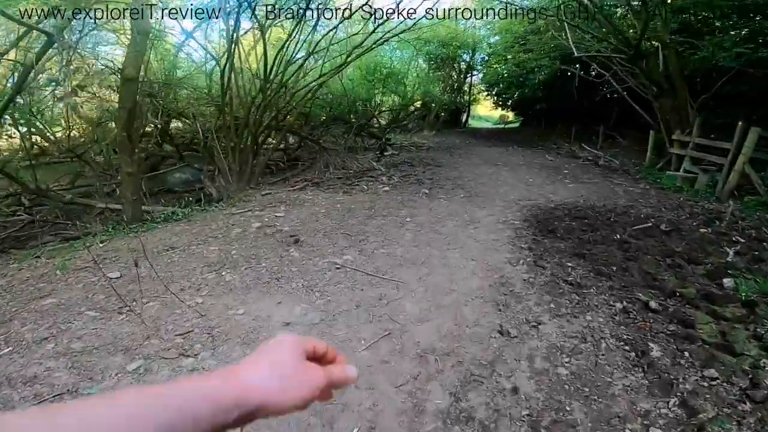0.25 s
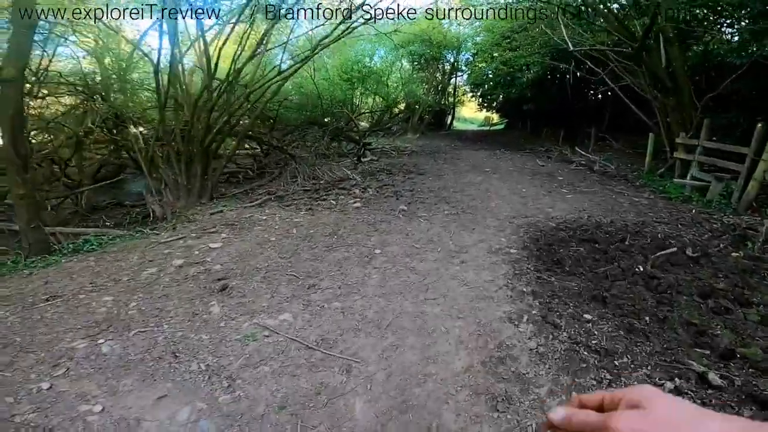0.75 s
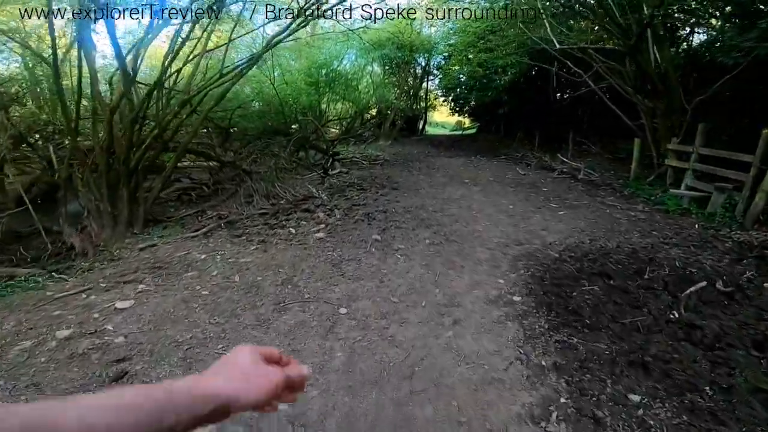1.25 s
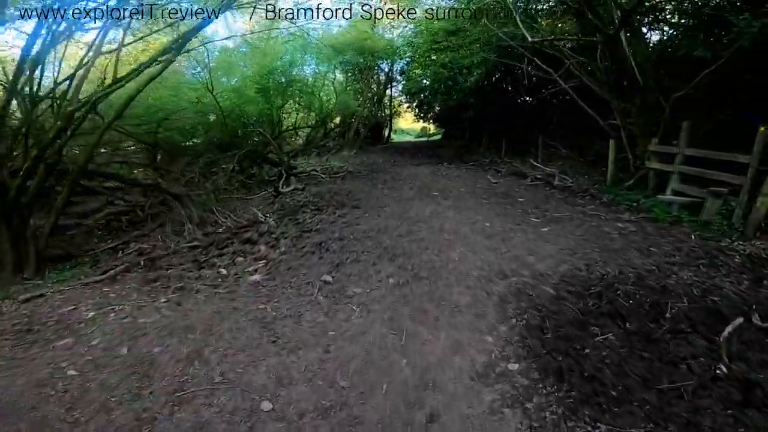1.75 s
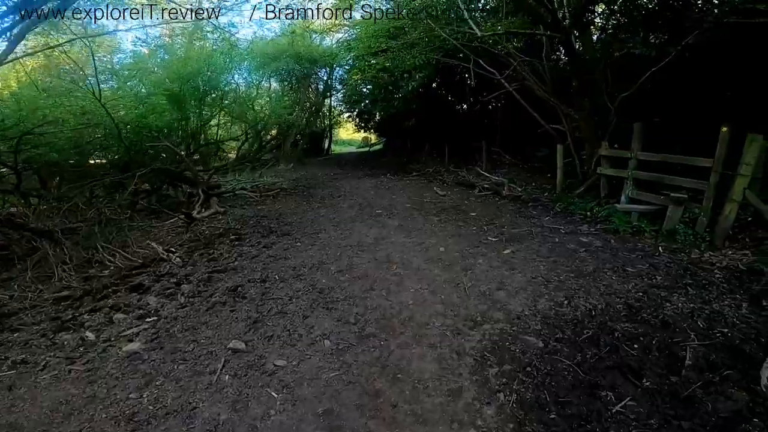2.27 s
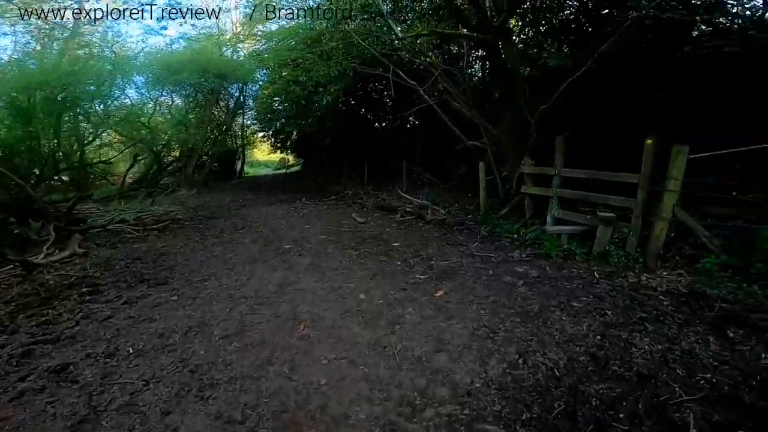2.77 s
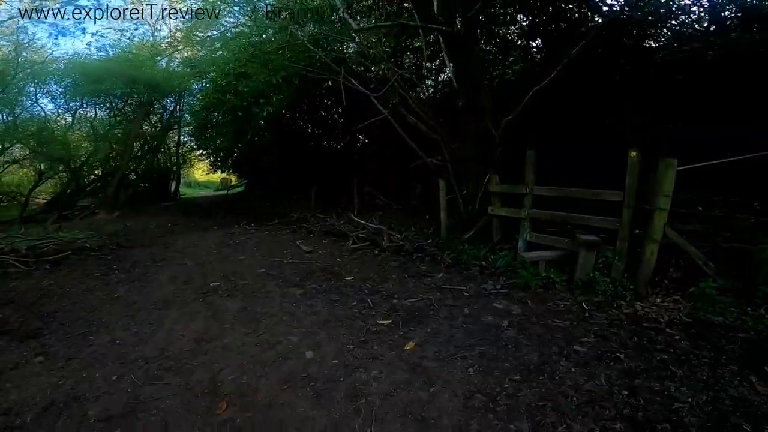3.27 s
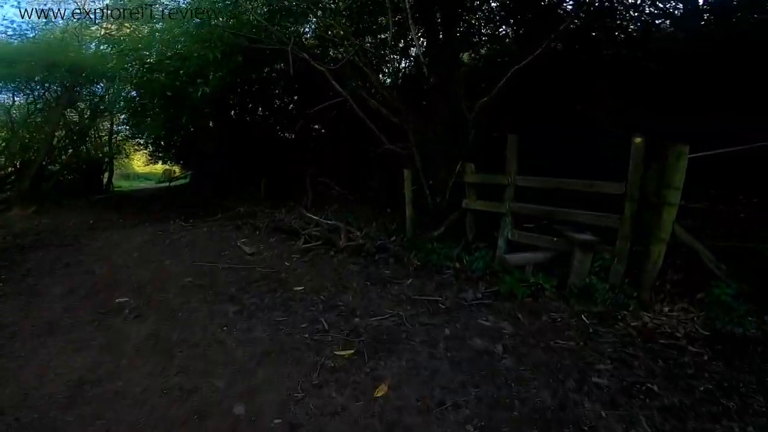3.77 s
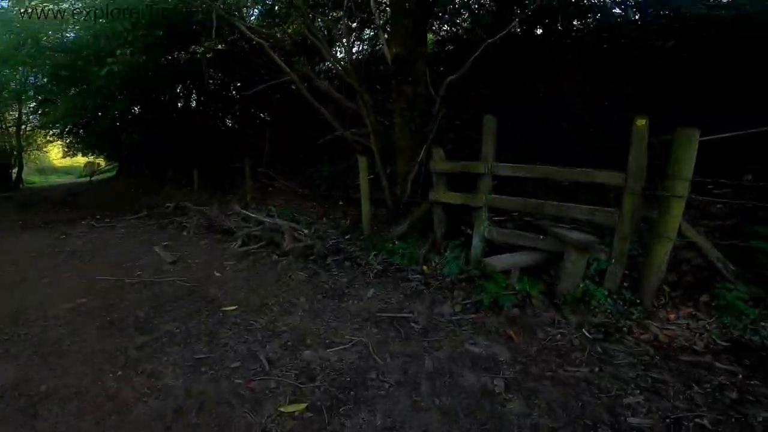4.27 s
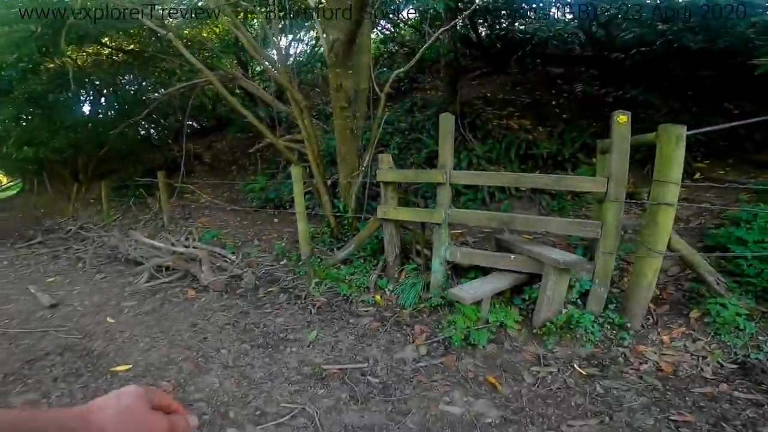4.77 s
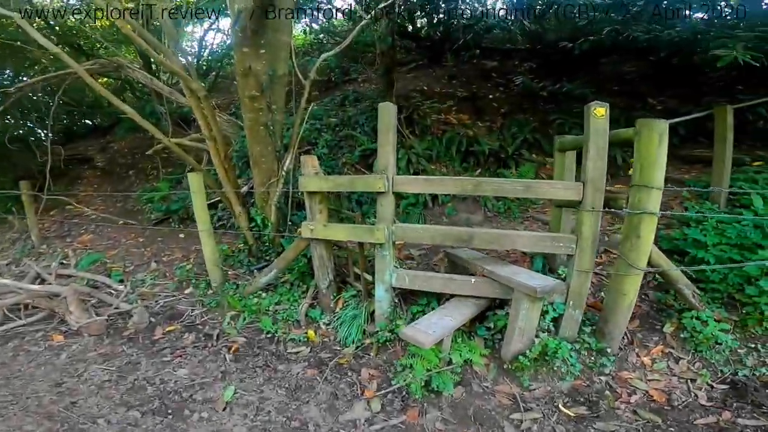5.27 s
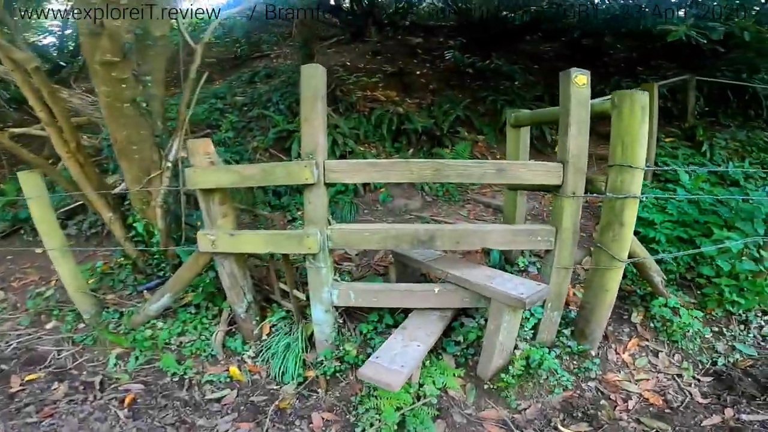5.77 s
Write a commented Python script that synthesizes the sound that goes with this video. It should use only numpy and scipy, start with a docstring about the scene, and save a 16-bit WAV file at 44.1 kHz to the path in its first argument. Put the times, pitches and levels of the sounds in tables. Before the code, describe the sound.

Someone walks a dry dirt path among trees, each step a gritty crunch with dull thuds, stone clicks and soft clothing rustle.

```python
"""A dry woodland path at walking pace, two microphones on the walker's body, beside a worn camera.
Air buffets the microphones from the start (shaped low noise), over the wood's hush and rubbing clothes (noise).
Soles crush grit about twice a second (clumped clicks), stones knock and crack (damped bursts), steps land with
brief low rings and dull thuds (decaying modes). A far bird calls faintly near the start and again near 5.1 s
(gliding sines). Stones rasp and one twig snaps (narrow noise), soles slide through litter (dense clicks) and
dry leaves snap and fizz (bright noise)."""
import sys
import numpy as np
from scipy import signal
from scipy.fft import rfft, irfft, next_fast_len
from scipy.io import wavfile
from scipy.ndimage import uniform_filter1d

SR = 44100
rng = np.random.default_rng(int(sys.argv[2]) if len(sys.argv) > 2 else 0)


def materialize(psi):
    """Save the field psi as 16-bit PCM at rate SR to the path in sys.argv[1].

    A 1-D psi becomes a single channel; in a 2-D psi each row is a channel.
    """
    bounded = np.clip(np.atleast_2d(psi).T, -1, 1)
    quanta = np.round(bounded * 32767).astype(np.int16)
    wavfile.write(sys.argv[1], SR, quanta)


N = 265614
TIME = np.arange(N) / SR
PADDED = next_fast_len(N, True)
FREQS = np.fft.rfftfreq(PADDED, 1 / SR)


def gain_of(db):
    """Amplitude factor of a level in dB."""
    return 10 ** (np.asarray(db) / 20)


def evened(x):
    """Scales to rms 1."""
    return x / np.sqrt(np.mean(x ** 2) + 1e-20)


def read(points, hz):
    """Reads a spectrum table along a log-frequency axis."""
    f, value = np.transpose(points)
    return np.interp(np.log(hz + 1), np.log(f + 1), value)


def curve(rows, axis=1):
    """One column of a time table, at every sample."""
    rows = np.array(rows)
    return np.interp(TIME, rows[:, 0], rows[:, axis])


def swell(centre_s, width_s):
    """A smooth rise and fall of height 1."""
    return np.exp(-((TIME - centre_s) / width_s) ** 2 / 2)


def held(start_s, length_s, rise_s, fall_s):
    """A straight rise to 1, a hold, then an exponential fall."""
    rise = np.clip((TIME - start_s) / rise_s, 0, 1)
    return rise * np.exp(-np.clip(TIME - start_s - length_s, 0, 1) / fall_s)


def panned(db):
    """Left and right gains for a left-right level difference."""
    return gain_of(np.array([db, -db]).reshape(2, -1) / 2)


def add(mix, s, sound):
    """Mixes a sound in at time s."""
    part = mix[:, max(round(s * SR), 0):][:, :sound.shape[-1]]
    part += sound[..., :part.shape[1]]


def colour(x, spectrum):
    """Minimum-phase filter of mean power gain 1: clicks keep their sharp front."""
    hz = abs(np.fft.fftfreq(4096, 1 / SR))
    log_gain = np.log(evened(gain_of(read(spectrum, hz))))
    taps = np.fft.ifft(np.exp(np.conj(signal.hilbert(log_gain)))).real[:2048]
    return signal.oaconvolve(x, taps[None], axes=1)[:, :x.shape[1]]


def paired(x, likeness):
    """Turns two unrelated signals into a partly alike left and right."""
    a, b = rfft(x, PADDED)
    same = np.clip(read(likeness, FREQS), 0, 1)
    shared = np.sqrt((1 + same) / 2) * a
    own = np.sqrt((1 - same) / 2) * b
    return irfft(np.array([shared + own, shared - own]), PADDED)[:, :N]


def noise(spectrum, likeness):
    """Steady stereo noise of rms 1."""
    return evened(colour(paired(rng.standard_normal((2, N)), likeness), spectrum))


def wander(per_s):
    """A random curve of rms 1 that takes a new direction per_s times a second."""
    return evened(np.interp(TIME * per_s, np.arange(N), rng.standard_normal(N)))


def grains(per_s, spread_db, clump_db, clumps_per_s, count=6):
    """Tiny fractures that come in clumps; crumbs of each size sound in their own octave."""
    octave = np.clip(np.log2((FREQS + 1) / 300), 0, count - 1)
    clumps = gain_of(clump_db * np.minimum(wander(clumps_per_s), 2))
    out = 0
    for k in range(count):
        at = np.flatnonzero(rng.random(N) < per_s / SR)
        clicks = np.zeros((2, N))
        spread = np.minimum(rng.exponential(1, N)[at], 3.5)
        size = gain_of(spread_db * spread) * clumps[at]
        clicks[:, at] = size * rng.standard_normal((2, N))[:, at]
        # the foot's weight sets the energy spent in any 40 ms, however it is shared among grains
        clicks /= np.sqrt(abs(uniform_filter1d((clicks ** 2).mean(0), size=1764)) + 1e-9)
        band = np.cos(np.pi / 2 * np.minimum(abs(octave - k), 1))
        out = out + rfft(clicks, PADDED) * band
    return irfft(out, PADDED)[:, :N]


# gusts at the microphones as the walker strides: start t/s, length t/s, level/dB, left-right level/dB
GUSTS = [(-.02, 0.21, -40, 8.5), (0.42, 0.3, -42, 3.5), (0.962, 0.21, -38, 9), (1.467, 0.31, -42, 6.5),
         (2.056, 0.19, -38, 3), (2.569, 0.18, -38.5, 4.5), (3.143, 0.096, -44.5, -1),
         (3.735, 0.26, -46.5, 2), (4.317, 0.099, -49, -3), (4.684, 0.066, -50.5, 1), (4.9, 0.18, -52.5, 0),
         (5.526, 0.064, -43.5, -3), (5.952, .1, -52, 0)]
# steady airflow, easing as the walk slows: t/s, level/dB
DRAUGHT = [(0, -49.5), (.8, -47.5), (1.35, -58.5), (2.4, -51), (3.0, -64), (3.4, -59), (4.2, -63.5),
           (6, -66)]
# single eddies striking the left microphone: t/s, peak level/dB, f/Hz
EDDIES = [(0.098, -24.5, 78), (0.158, -26.5, 85), (0.589, -25.5, 73.4), (1.015, -27.5, 60),
          (1.106, -19.5, 70), (1.146, -20.5, 75), (1.755, -31.5, 74.4), (2.675, -23, 62),
          (2.745, -20, 68.6)]
# spectrum of the turbulence: f/Hz, relative level/dB
WIND_SPECTRUM = [(10, -11.5), (28, 9), (60, -1.5), (110, -10), (170, -15), (260, -26), (500, -45.5),
                 (5000, -110)]
# likeness of the turbulence at the two microphones: f/Hz, likeness (0-1)
WIND_LIKENESS = [(30, 0.56), (200, 0.75)]


def air(right_db=-18, draught_lean_db=3, gust_rise_s=0.023, gust_fall_s=0.042):
    """Low turbulence: gusts rise, hold and die over a draught; an eddy is one swing of pressure."""
    flow = noise(WIND_SPECTRUM, WIND_LIKENESS)
    flow /= np.sqrt(uniform_filter1d(flow ** 2, size=4000, axis=1))
    power = (gain_of(curve(DRAUGHT)) * panned(draught_lean_db)) ** 2
    for s, length, db, lean_db in GUSTS:
        gust = held(s, length, gust_rise_s, gust_fall_s)
        power += (gain_of(db) * panned(lean_db) * gust) ** 2
    out = flow * np.sqrt(power)
    for s, db, hz in EDDIES:
        u = 2 * np.pi * hz * (TIME - s)
        swing = u * np.exp((1 - np.minimum(u ** 2, 100)) / 2)
        out -= gain_of([[db], [db + right_db]]) * swing  # the right microphone gets less
    return out


# spectrum of the wood all round: f/Hz, relative level/dB
WOODS_SPECTRUM = [(30, -4.5), (100, -11.5), (170, 6), (300, -3), (700, -9.5), (1250, -19), (5000, -21),
                  (8000, -27.5), (12000, -42), (14000, -62)]
# spectrum of the hush around 1.3 kHz: f/Hz, relative level/dB
MIDS_SPECTRUM = [(300, -31), (900, -8), (1250, -1), (1650, -10), (3000, -18.5), (8000, -54)]
# how that midrange hush comes and goes: t/s, level/dB
MIDS_LEVEL = [(0, -78), (1.3, -69), (1.9, -65), (2.4, -72), (2.9, -63.5), (3.2, -64.5), (3.6, -70.5),
              (4.6, -73.5), (5, -58.5), (5.4, -75), (6, -63)]
# likeness at the two microphones of the hush and the clothes: f/Hz, likeness (0-1)
WIDE_LIKENESS = [(40, 0.94), (250, 0.75), (1000, 0.48), (2500, 0.22), (6000, 0.12)]


def woods(level_db=-62, lean_db=1.3):
    """The distant hush of the trees: steady broad noise and a midrange that varies in level."""
    steady = gain_of(level_db) * noise(WOODS_SPECTRUM, WIDE_LIKENESS)
    mids = gain_of(curve(MIDS_LEVEL)) * noise(MIDS_SPECTRUM, WIDE_LIKENESS)
    return panned(lean_db) * (steady + mids)


# clothing rubs as a leg swings through between steps: centre t/s, half-width t/s, level/dB
SWINGS = [(.385, 0.035, -61.5), (0.891, 0.041, -62.5), (1.45, 0.025, -59), (1.97, 0.084, -64.5),
          (3.04, 0.042, -68), (4.13, 0.07, -65.5), (4.99, 0.095, -62.5), (5.33, 0.043, -68.5)]
# spectrum of rubbed cloth: f/Hz, relative level/dB
CLOTH_SPECTRUM = [(300, -11), (900, -5.5), (1800, 4), (3000, 1), (6500, -8.5), (9000, -16), (14000, -32)]
# a steady rustle fades as the walk slows
RUSTLE_DB, RUSTLE_DB_PER_S = -67.5, -1
# cloth rubs again as the knee takes the weight after each heel
KNEE_AFTER_S, KNEE_WIDTH_S, KNEE_DB = 0.074, 0.051, -65


def clothes(flutter_db=2.0):
    """Fabric close to the microphones rubs with each leg swing and knee bend: noise follows its speed."""
    speed = gain_of(RUSTLE_DB + RUSTLE_DB_PER_S * TIME)
    speed += sum(gain_of(db) * swell(s, width) for s, width, db in SWINGS)
    speed += gain_of(KNEE_DB) * sum(swell(step[0] + KNEE_AFTER_S, KNEE_WIDTH_S) for step in STEPS)
    return speed * gain_of(flutter_db * wander(90)) * noise(CLOTH_SPECTRUM, WIDE_LIKENESS)


def crunch(start_s, length_s, rise_s=0.0044, shape=2.36):
    """Pressure on the grit: a quick rise, then a fade as it packs down."""
    age = np.maximum(TIME - start_s, 0)
    return (1 - np.exp(-age / rise_s)) * np.exp(-(age / length_s) ** shape)


# footsteps: heel lands t/s, heel crunch level/dB, its length t/s,
# delay until the sole lands t/s, sole crunch level/dB, its length t/s
STEPS = [(-0, -43.5, 0.058, 0.065, -48, 0.02), (0.472, -46.5, 0.029, 0.03, -41, 0.038),
         (1.003, -52, 0.038, 0.08, -53, .025), (1.523, -47.5, 0.03, 0.035, -49.5, 0.071),
         (2.077, -53, 0.024, 0.025, -47.5, 0.027), (2.594, -50.5, 0.014, 0.029, -56, 0.025),
         (3.16, -50, 0.077, 0.09, -51.5, 0.033), (3.708, -52.5, 0.026, 0.085, -51.5, 0.037),
         (4.291, -47.5, 0.024, 0.099, -43, 0.043), (4.78, -44, 0.037, 0.075, -46.5, 0.026),
         (5.51, -58, 0.043, 0.015, -37.5, 0.016), (5.958, -39, 0.018, 0.028, -38, 0.037)]
# grit shifts as the rear foot pushes off: t/s, level/dB
PUSHES = [(.23, -62), (0.778, -59), (1.84, -57), (3.955, -58.5), (5.095, -54.5)]
# grit creaks faintly while the foot bears weight
STANCE_DB, STANCE_S = -61.5, 0.31


def footwork(push_width_s=0.028):
    """How hard the shoes grind: heel, sole, the weight of the stance, push-off."""
    power = sum((gain_of(db) * swell(s, push_width_s)) ** 2 for s, db in PUSHES)
    for heel_s, heel_db, heel_length, delay, sole_db, sole_length in STEPS:
        power += (gain_of(heel_db) * crunch(heel_s, heel_length)) ** 2
        power += (gain_of(sole_db) * crunch(heel_s + delay, sole_length)) ** 2
        power += (gain_of(STANCE_DB) * crunch(heel_s, STANCE_S)) ** 2
    return np.sqrt(power)


# spectrum of crushed grit: f/Hz, relative level/dB
GRIT_SPECTRUM = [(120, -13), (300, 3), (550, 0.5), (800, -6.5), (1100, 2), (1600, -2.5), (2300, -10),
                 (3300, -14.5), (6500, -25), (9000, -34.5), (14000, -61)]
# likeness of sounds from the feet at the two microphones: f/Hz, likeness (0-1)
FEET_LIKENESS = [(200, 1), (1200, 0.99), (2500, 0.64), (5000, 0.96), (10000, 0.77)]


def grit():
    """Grit breaks and shifts under the sole: clumped clicks follow the pressure."""
    breaks = grains(per_s=1400, spread_db=3.0, clump_db=3.0, clumps_per_s=300)
    return colour(footwork() * paired(breaks, FEET_LIKENESS), GRIT_SPECTRUM)


# louder stones and twigs clicking under the shoes: t/s, knock level/dB, knock f/Hz, crack level/dB
STONES = [(0.0163, -32, 1830, -32.5), (0.0525, -36.5, 1140, -65), (0.0718, -41, 866, -50),
          (0.0791, -55, 1700, -46.5), (0.085, -32.5, 1030, -42), (0.222, -50, 780, -74),
          (.473, -47, 955, -70), (.52, -42, 945, -67), (0.568, -46.5, 1350, -55.5),
          (.618, -56, 2020, -52.5), (0.743, -47, 910, -73), (1.0626, -31.5, 1450, -68),
          (1.073, -32, 1640, -39.5), (1.122, -38.5, 1170, -45), (1.127, -33, 1010, -45.5),
          (1.527, -57, 1300, -48), (1.667, -40.5, 1370, -53.5), (1.825, -43, 1280, -59.5),
          (1.838, -44, 1060, -53.5), (2.076, -40, 1700, -59), (2.1628, -35, 1730, -36.5),
          (2.1753, -33.5, 1210, -45), (2.2093, -45, 1100, -50), (2.2128, -26.5, 1170, -44),
          (2.6363, -34.5, 1450, -53.5), (2.6451, -35.5, 800, -67), (2.7, -48, 1540, -54),
          (2.7322, -40.5, 1040, -73), (2.904, -49, 746, -80), (3.1948, -47, 1420, -61),
          (3.2492, -44, 1280, -70), (3.2804, -39.5, 1680, -50.5), (3.7653, -38, 1330, -64),
          (3.7878, -59, 2000, -51), (4.287, -43, 1380, -69), (4.3848, -39, 1310, -70),
          (4.399, -39, 1210, -50), (4.4141, -31.5, 1090, -56), (4.4248, -48, 810, -42),
          (4.438, -22.5, 1090, -39.5), (4.8947, -43, 2320, -46.5), (4.9272, -32.5, 760, -57),
          (4.928, -35, 1430, -44.5), (5.077, -43, 1430, -46.5), (5.1707, -43.5, 1570, -60),
          (5.4855, -45.5, 885, -78), (5.5922, -45, 1020, -67)]
# spectrum of a crack: f/Hz, relative level/dB
CRACK_SPECTRUM = [(400, -66), (1500, 10), (2400, 15), (3450, 13.5), (5000, -1), (6700, -5), (9000, -28),
                  (14000, -40)]


def stones(knock_s=0.0004, crack_s=0.00044, settle_s=0.008, settle_db=-19, grain=0.4, soil_hz=2300):
    """A stone slips with a crack and a brief knock damped by the soil; crumbs settle after it."""
    knocks, cracks = np.zeros((2, 2, N))
    t = np.arange(-130, 1100) / SR
    span = np.sqrt(220)  # sets levels as rms over 5 ms, ahead of the filters below
    blow = 1 / np.cosh(t / knock_s)
    settle = gain_of(settle_db) * np.exp(-abs(t) / settle_s) * (t > 0)
    soil = signal.butter(2, soil_hz, fs=SR)
    for s, knock_db, hz, crack_db in STONES:
        rubble = colour(rng.standard_normal((1, len(t))), GRIT_SPECTRUM)[0]
        crumbs = signal.lfilter(*soil, rubble)
        tone = np.sin(2 * np.pi * (hz * t + rng.random()))
        knock = blow * tone + (grain * blow + settle) * crumbs
        add(knocks, s + t[0], gain_of(knock_db) * span * knock / np.linalg.norm(knock))
        crack = rng.standard_normal((2, len(t))) * (1 / np.cosh(t / crack_s) + settle / 2)
        add(cracks, s + t[0], gain_of(crack_db) * span * crack / np.linalg.norm(crack[0]))
    # a knock has little bass or fizz
    knocks = signal.filtfilt(*signal.butter(2, [380, 5500], "bandpass", fs=SR), knocks)
    return knocks + colour(paired(cracks, FEET_LIKENESS), CRACK_SPECTRUM)


# dull heel thuds and brief low rings as steps land: t/s, level/dB, main f/Hz, left-right level/dB
LANDINGS = [(0.017, -16, 296, -4.5), (0.5696, -20.5, 293, 3), (0.994, -31, 300, 0),
            (1.0744, -17.5, 295, -4.5), (1.266, -44, 353, -1), (1.524, -33, 156, 4),
            (2.083, -33.5, 169, -1), (2.164, -17.5, 298, -5), (2.646, -33, 341, 1), (4.704, -43, 410, 1),
            (5.225, -48.5, 425, 0), (5.529, -36, 330, 0)]
# modes of a landing: multiple of the main f, relative level/dB, 60 dB decay t/s
LANDING_MODES = [(1, 0, 0.044), (.62, 2.5, 0.019), (2.3, -20.5, 0.06)]


def landings(rise_s=0.00038):
    """Dull heel thuds and brief low rings as steps land: each a sum of quickly decaying modes."""
    out = np.zeros((2, N))
    t = np.arange(SR // 10) / SR
    for s, db, hz, pan_db in LANDINGS:
        modes = sum(gain_of(mode_db - 60 * t / t60) * np.sin(2 * np.pi * hz * ratio * t)
                    for ratio, mode_db, t60 in LANDING_MODES)
        add(out, s, gain_of(db) * panned(pan_db) * modes * (1 - np.exp(-t / rise_s)))
    return signal.sosfilt(signal.butter(1, 70, "highpass", fs=SR, output="sos"), out)


def trees(x, t60=0.17):
    """Trunks and leaves scatter a short tail: decaying noise, from 6 ms on, convolved with the sound."""
    t = np.arange(SR // 2) / SR
    tail = rng.standard_normal((2, len(t))) * gain_of(-60 * t / t60) * (t > .006)
    return signal.fftconvolve(x, tail / np.linalg.norm(tail[0]), axes=1)[:, :N]


# far bird notes: t/s, length t/s, start f/Hz, end f/Hz, peak level/dB
BIRD_NOTES = [(0.21, 0.17, 4500, 4400, -72), (5.087, 0.102, 2380, 2715, -58.5)]


def bird(waver=0.004):
    """Thin whistles far off: gliding sines with a slight random waver."""
    out = np.zeros((2, N))
    for s, length, start_hz, end_hz, db in BIRD_NOTES:
        part = np.clip((TIME - s) / length, 0, 1)
        hz = (start_hz + (end_hz - start_hz) * part) * (1 + waver * wander(160))
        out += gain_of(db) * np.sin(np.pi * part) * np.sin(2 * np.pi * np.cumsum(hz) / SR)
    return out


# short rasps of stones, and one bright twig snap at 4.863 s: t/s, half-width t/s, level/dB, f/Hz
RASPS_AND_SNAP = [(0.5133, 0.0016, -38, 1440), (1.579, 0.0032, -34, 1010), (4.8634, 0.00083, -33, 4200),
                  (5.53, .0024, -30.5, 1320), (5.969, 0.0024, -27, 1230)]


def rasps_and_twig_snap(width=0.26):
    """Stones rasp by quick stick and slip, and a twig snaps: short, rough noise around one pitch each."""
    out = np.zeros((2, N))
    for s, length, db, hz in RASPS_AND_SNAP:
        band = np.exp(-(np.log((FREQS + 1) / hz) / width) ** 2 / 2)  # width in natural-log frequency
        burst = swell(s, length)
        rough = burst * irfft(rfft(rng.standard_normal(PADDED)) * band, PADDED)[:N]
        out += gain_of(db) * rough * np.linalg.norm(burst) / np.linalg.norm(rough)
    return out


# the sole slides through loose earth and leaf litter: start t/s, length t/s,
# grinding level/dB, crackle level/dB, pitch of the earth (multiple)
SLIDES = [(1.011, 0.025, -59, -56, 1), (1.819, 0.012, -55, -64, 1.1), (2.072, 0.013, -62, -48, 1),
          (2.585, 0.03, -62.5, -54.5, 1.2), (2.627, 0.023, -49.5, -51.5, 1.1),
          (3.709, 0.05, -51.5, -63, .75), (3.748, 0.022, -48.5, -57, .9), (4.28, 0.035, -61, -55, 1),
          (4.754, 0.013, -45.5, -59, 1.6), (4.788, 0.039, -33, -37, 1.05), (4.838, 0.026, -39, -44, 1),
          (4.859, 0.024, -44.5, -39.5, 1.15), (5.492, 0.043, -43.5, -57, .9), (5.963, 0.042, -36, -45, .7)]
# spectrum of earth grinding under a sliding sole, at pitch 1: f/Hz, relative level/dB
EARTH_SPECTRUM = [(110, -10), (230, -5), (420, 3), (650, 6), (900, -1.5), (1400, -2), (2300, -12.5),
                  (14000, -50)]
# spectrum of crackling leaves: f/Hz, relative level/dB
CRACKLE_SPECTRUM = [(500, -19), (1500, 6.5), (2400, 8), (3300, -1), (4600, -7), (6400, -18), (9000, -30),
                    (14000, -47)]


def slides(judder_db=1.5, rise_s=0.0044, fall_s=0.0098):
    """Dense tiny fractures run together while the sole judders along; deeper litter sounds lower."""
    judder = gain_of(judder_db * wander(130))
    fractures = grains(per_s=5000, spread_db=0.5, clump_db=1, clumps_per_s=300)
    earth = judder * paired(fractures, FEET_LIKENESS)
    crackles = grains(per_s=1100, spread_db=2.5, clump_db=1.5, clumps_per_s=420)
    leaves = judder * paired(crackles, FEET_LIKENESS)
    out, crackle_power = np.zeros((2, N)), 0
    for s, length, grind_db, crackle_db, pitch in SLIDES:
        motion = held(s, length, rise_s, fall_s)
        grinding = (gain_of(grind_db) * motion * earth)[:, round(s * SR):][:, :SR // 2]
        add(out, s, colour(grinding, [(hz * pitch, db) for hz, db in EARTH_SPECTRUM]))
        crackle_power += (gain_of(crackle_db) * motion) ** 2
    return out + colour(np.sqrt(crackle_power) * leaves, CRACKLE_SPECTRUM)


# dry leaves that snap under a stone: t/s, level/dB
SNAPS = [(1.1258, -44), (2.2126, -39), (3.741, -44.5), (4.4378, -36), (5.969, -37)]
# short scuffs through dry leaves: t/s, length t/s, level/dB
SCUFFS = [(3.717, 0.11, -65), (3.98, 0.036, -49), (5.957, 0.035, -42.5)]
# spectrum of dry leaves: f/Hz, relative level/dB
LEAVES_SPECTRUM = [(800, 2), (2500, 0.5), (4500, -1.5), (7500, -3.5), (10000, -17), (14000, -31)]


def scuffs(rise_s=0.00091, snap_s=0.00058):
    """A single leaf snaps in about a millisecond; a toe brushing dry leaves is a bright fizz that fades."""
    level = sum(gain_of(db) * swell(s, snap_s) for s, db in SNAPS)
    for s, length, db in SCUFFS:
        age = np.maximum(TIME - s, 0)
        level += gain_of(db) * (1 - np.exp(-age / rise_s)) * np.exp(-(age / length) ** 2)
    return level * gain_of(2 * wander(200)) * noise(LEAVES_SPECTRUM, FEET_LIKENESS)


# level of the ground at the left microphone against the right: f/Hz, left-right level/dB
GROUND_LEAN = [(250, -2), (600, 1.7), (1200, 1), (2400, 4), (4500, 1.5), (9000, -1.5)]
# the right microphone is a little nearer to the feet: f/Hz, its lead/rad
RIGHT_LEAD = [(350, 0.02), (2300, 0.72), (6000, 0.5)]


def scene():
    """Feet below, clothes and air close to the microphones, the wood all round."""
    lead = np.exp(1j * read(RIGHT_LEAD, FREQS) * np.array([[0], [1]]))
    microphones = panned(read(GROUND_LEAN, FREQS)) * lead
    ground = grit() + stones() + rasps_and_twig_snap() + slides() + scuffs()
    feet = irfft(rfft(ground, PADDED) * microphones, PADDED)[:, :N]
    song = bird()
    scattered = gain_of(-20.0) * trees(feet) + trees(song, t60=0.16) / 2
    return air() + woods() + clothes() + feet + landings() + song + scattered


def record(dry, edge_hz=14200):
    """The recorder's band limit: a steep linear-phase low-pass."""
    taps = signal.firwin(401, edge_hz, window=("kaiser", 8), fs=SR)
    return signal.oaconvolve(dry, taps[None], "same")


dry = scene()
out = record(dry)
materialize(out)
```